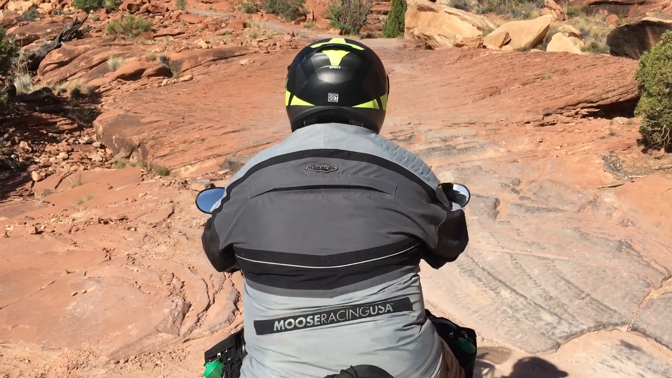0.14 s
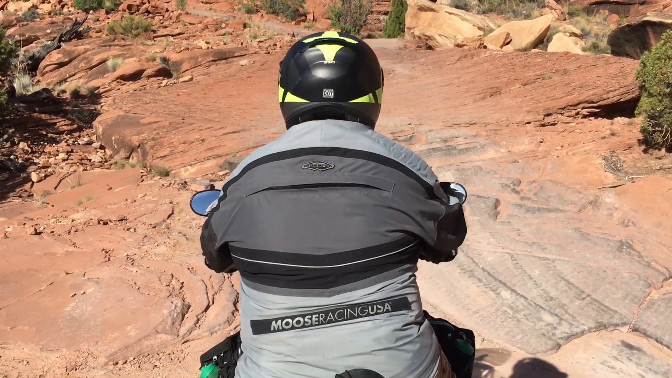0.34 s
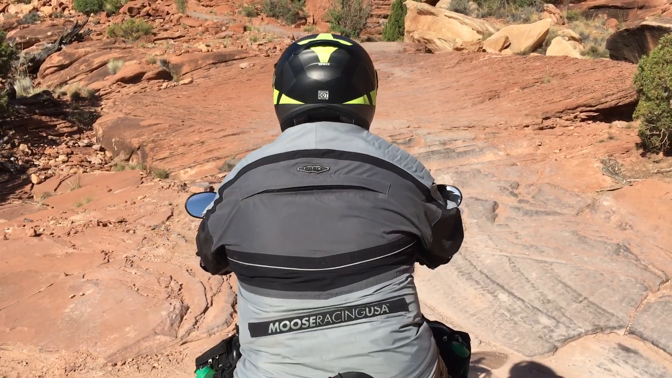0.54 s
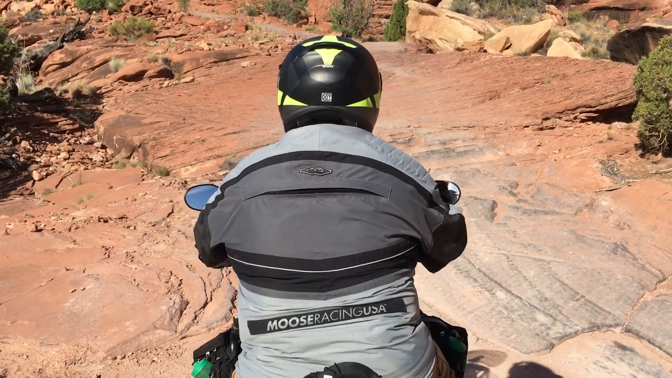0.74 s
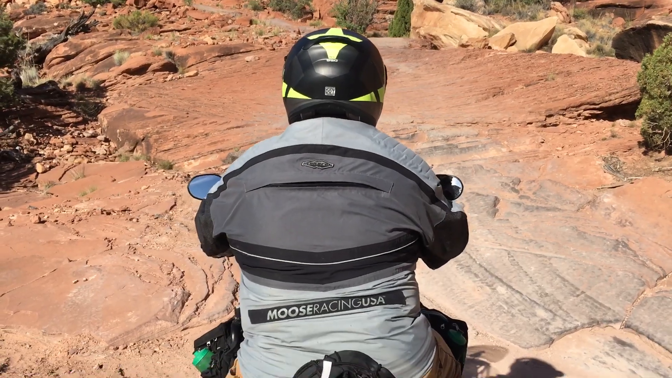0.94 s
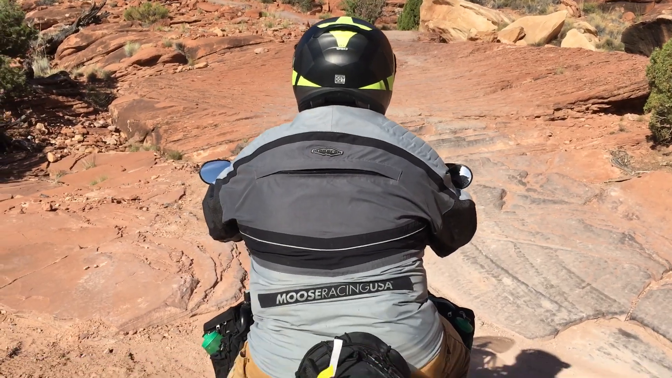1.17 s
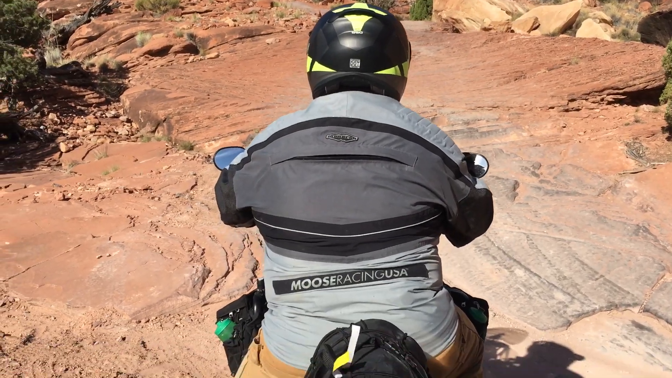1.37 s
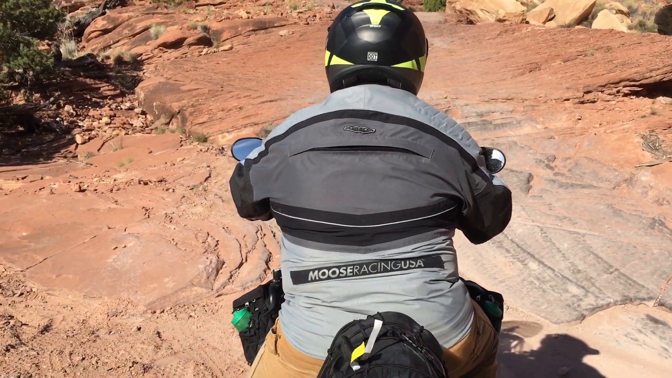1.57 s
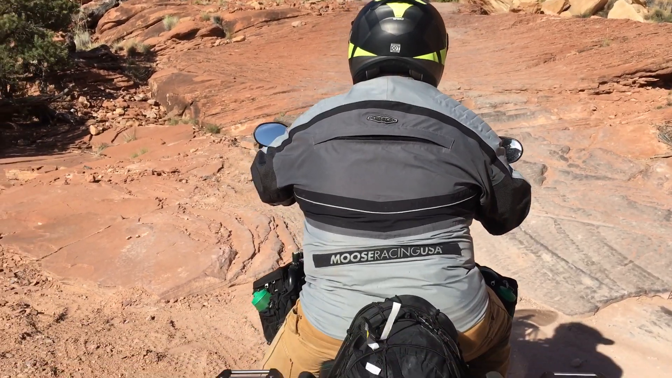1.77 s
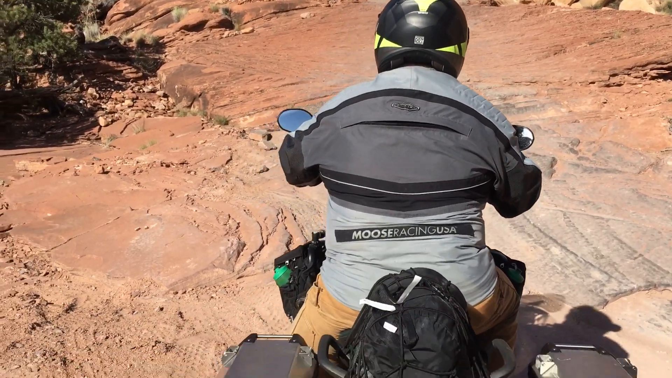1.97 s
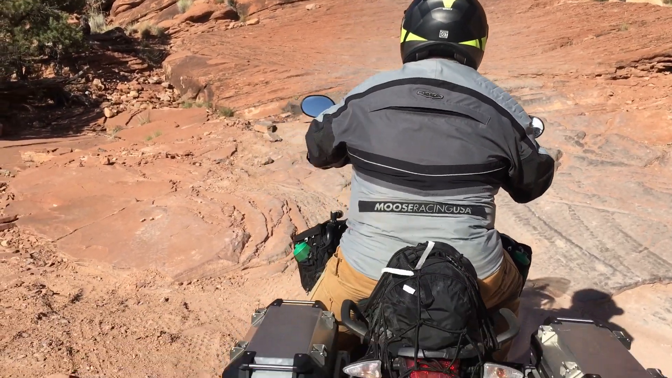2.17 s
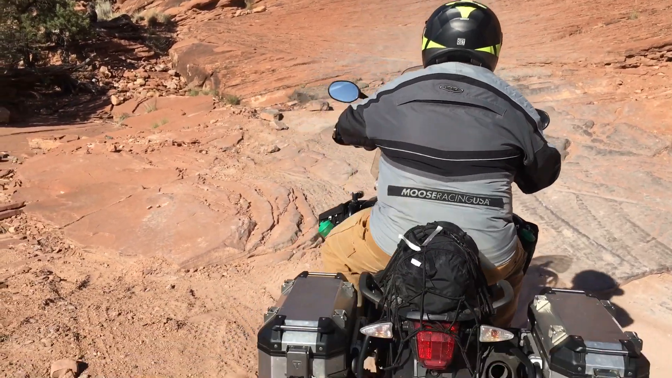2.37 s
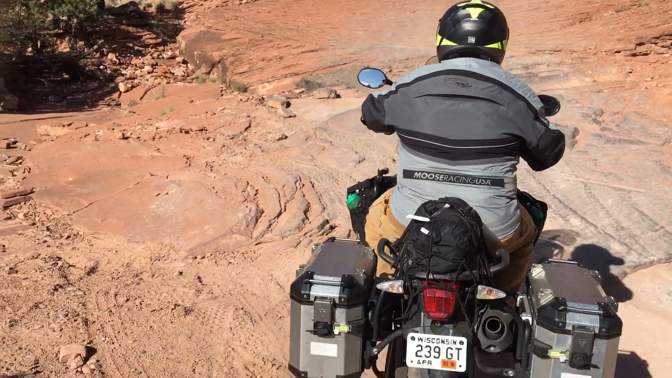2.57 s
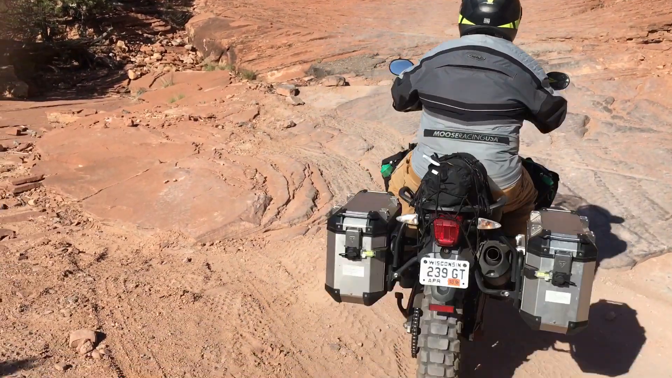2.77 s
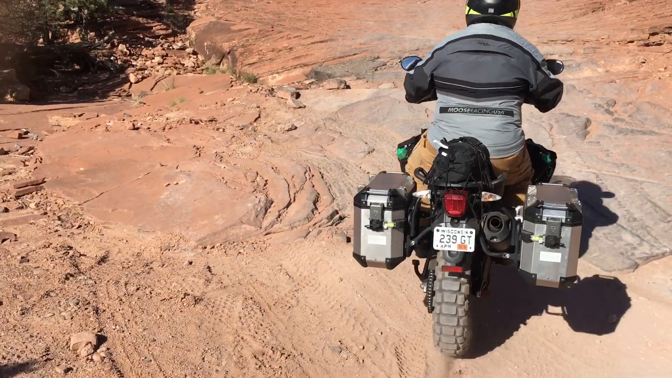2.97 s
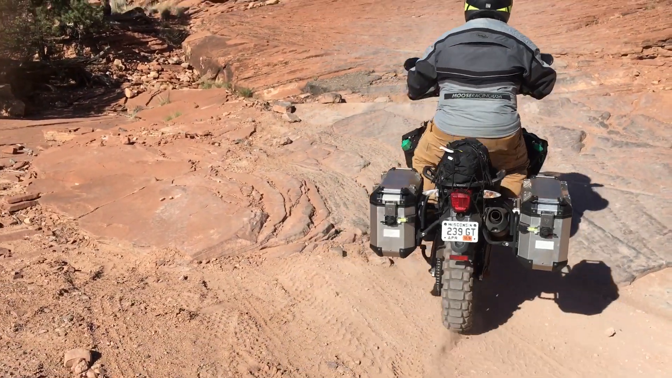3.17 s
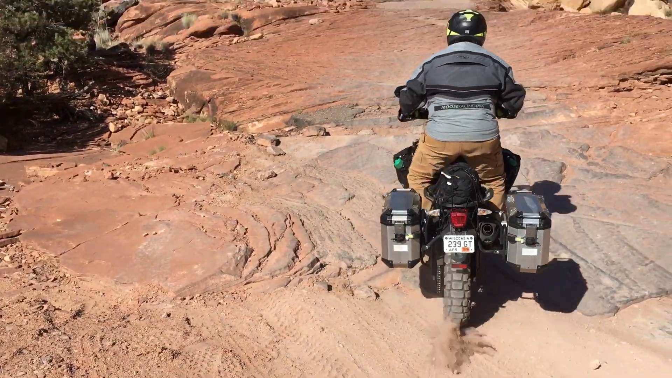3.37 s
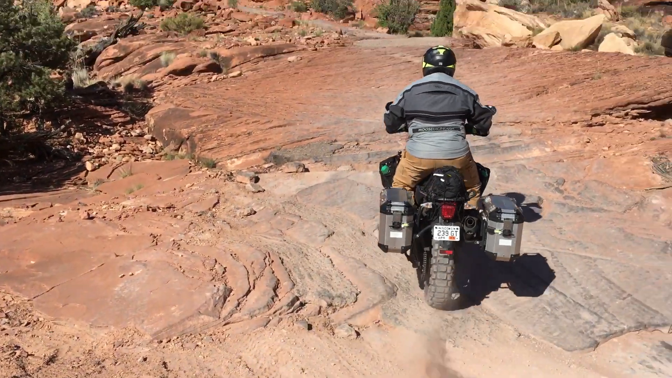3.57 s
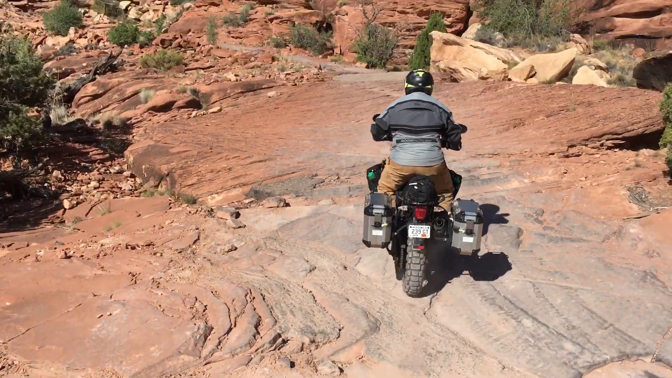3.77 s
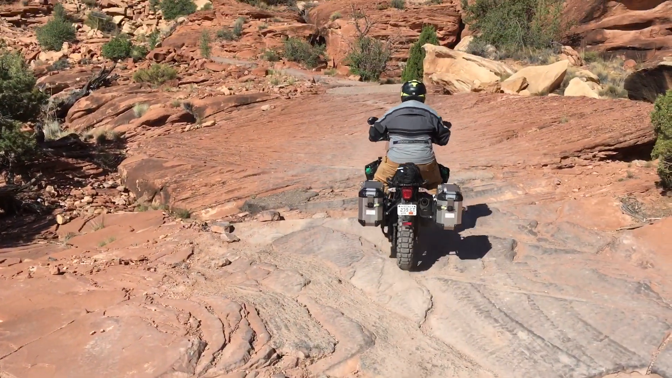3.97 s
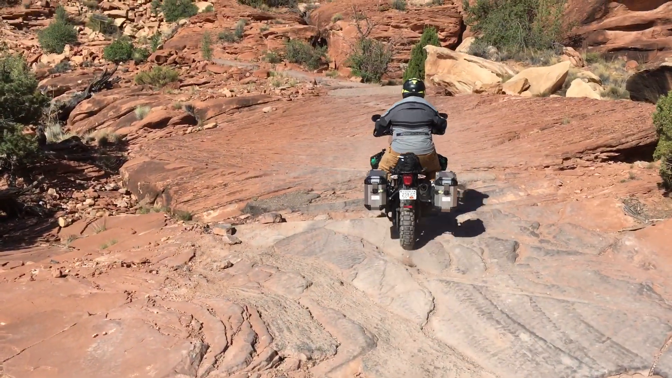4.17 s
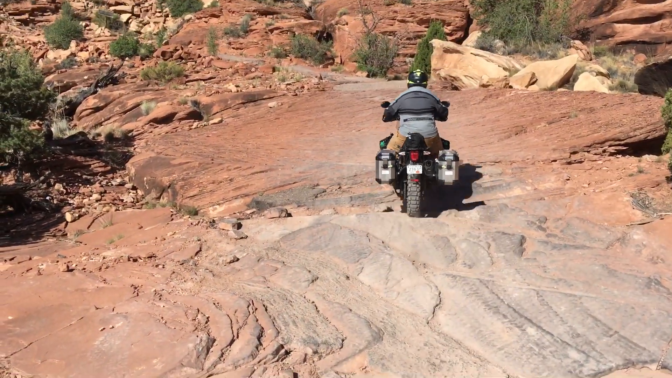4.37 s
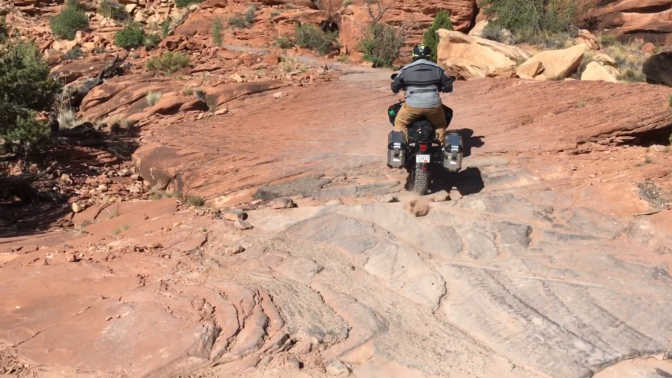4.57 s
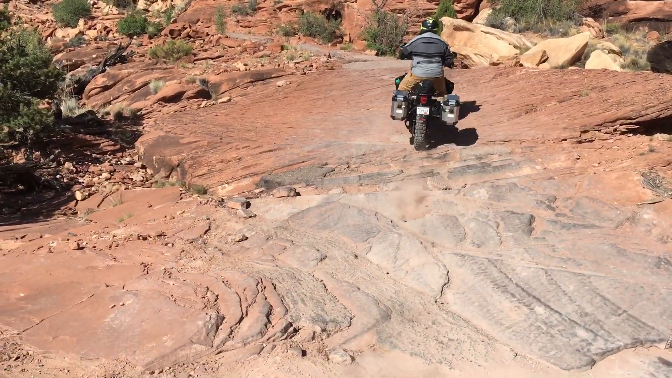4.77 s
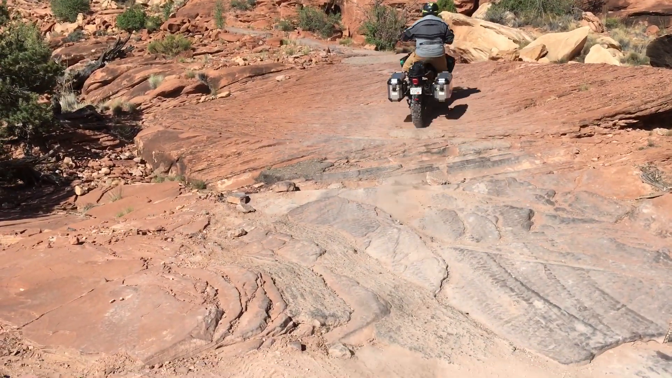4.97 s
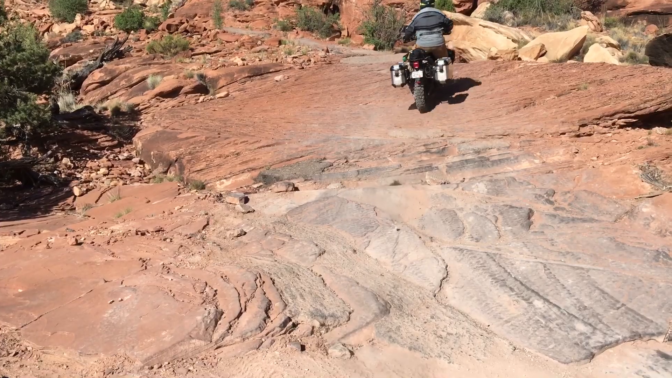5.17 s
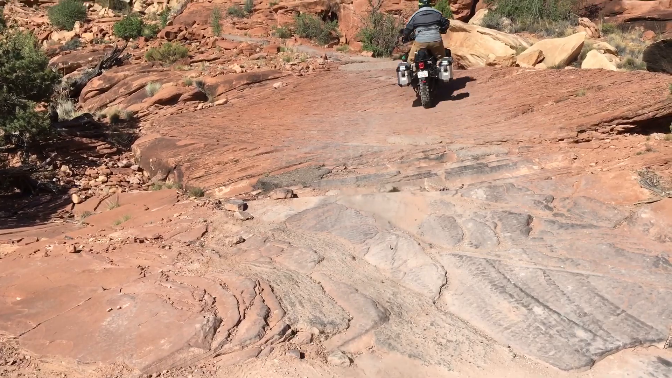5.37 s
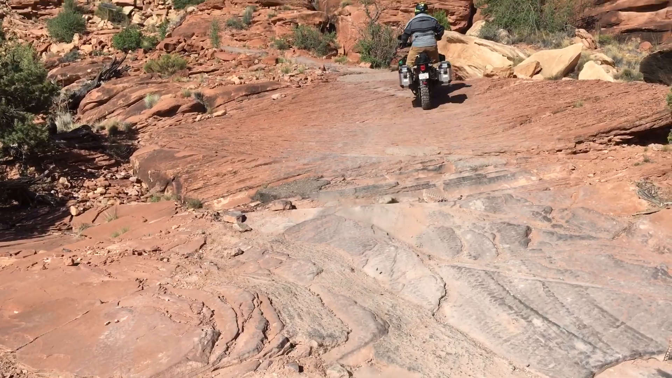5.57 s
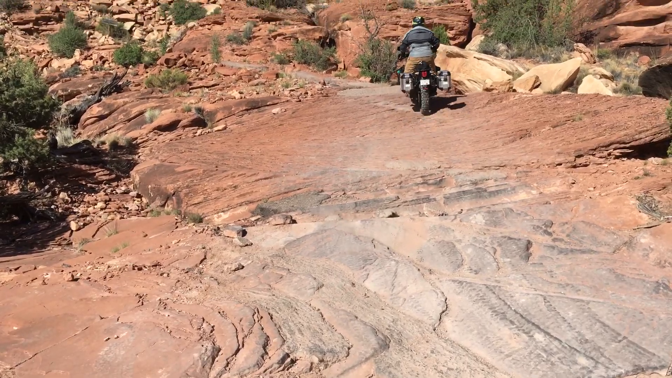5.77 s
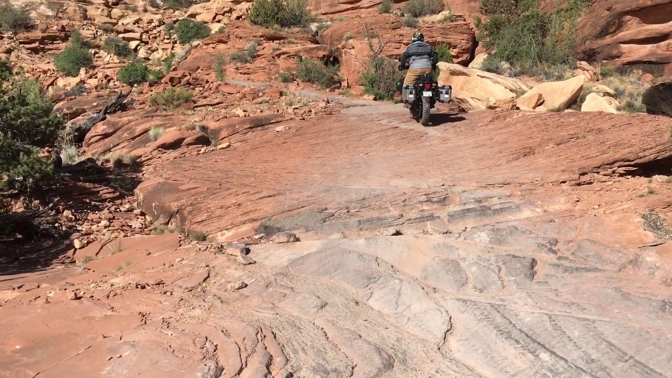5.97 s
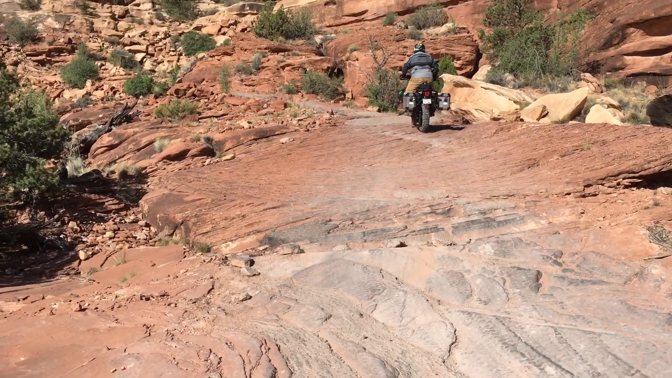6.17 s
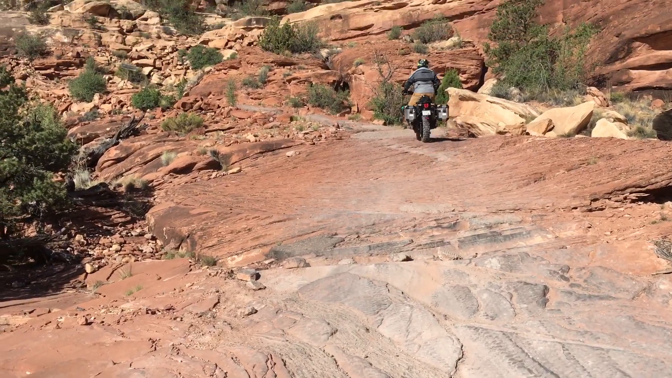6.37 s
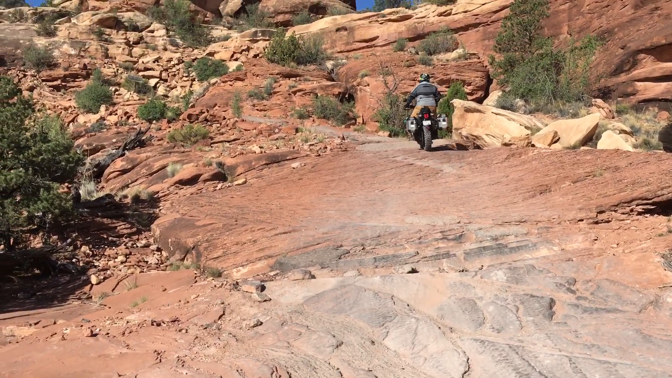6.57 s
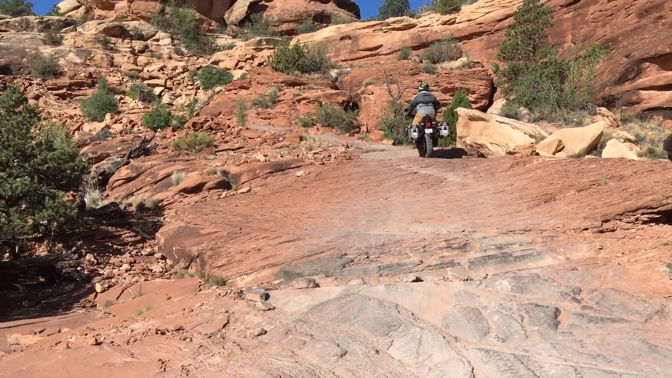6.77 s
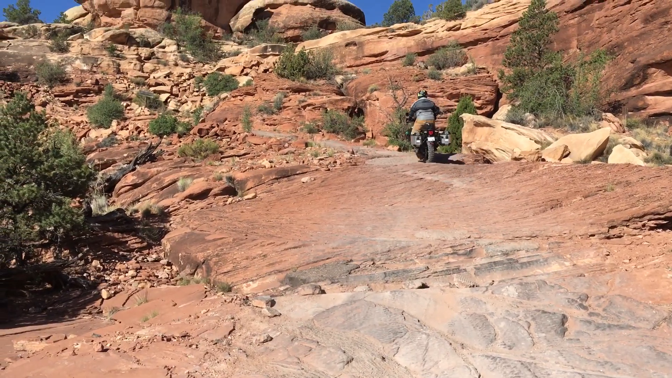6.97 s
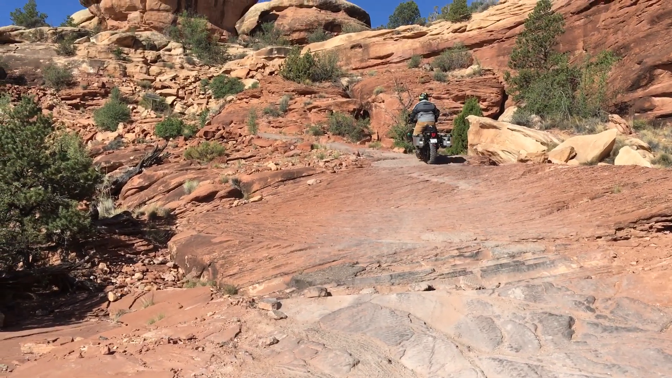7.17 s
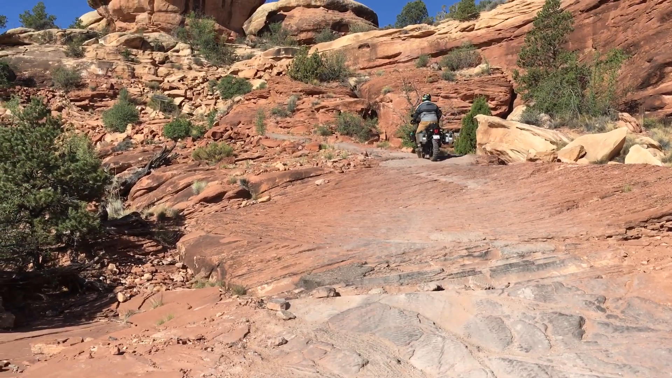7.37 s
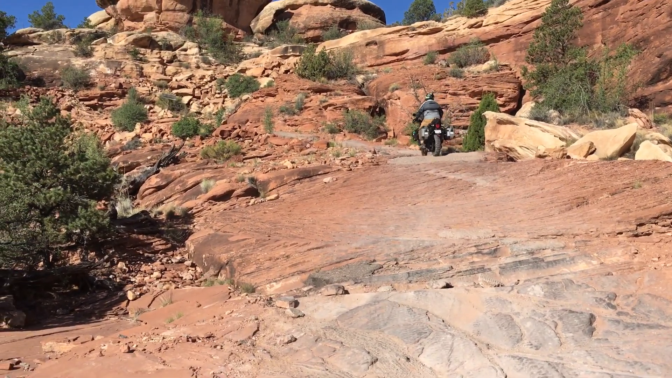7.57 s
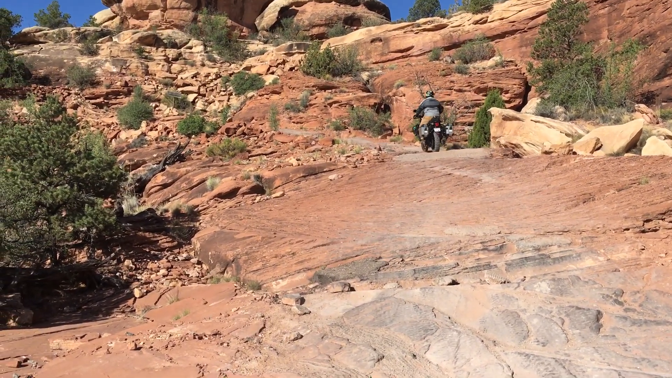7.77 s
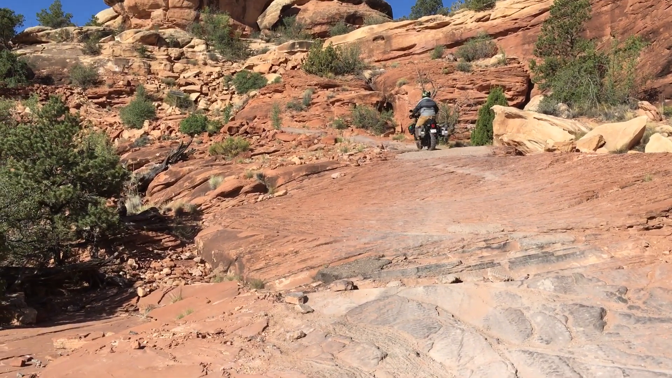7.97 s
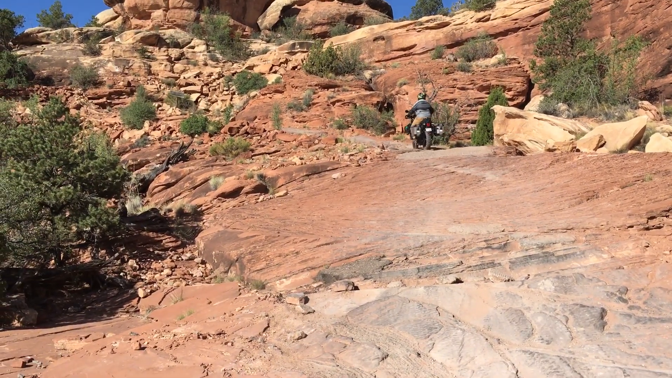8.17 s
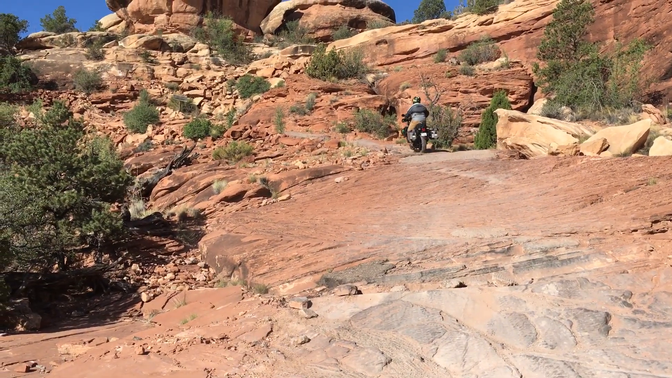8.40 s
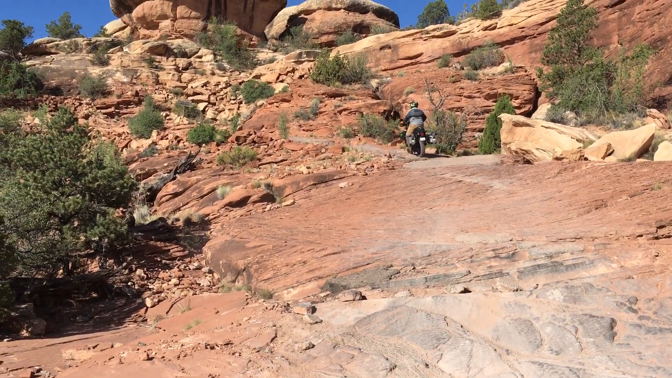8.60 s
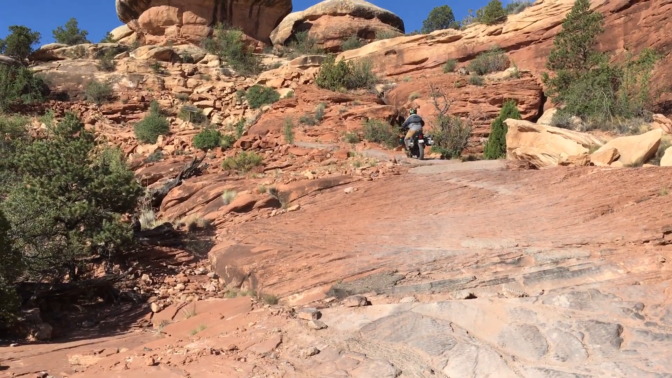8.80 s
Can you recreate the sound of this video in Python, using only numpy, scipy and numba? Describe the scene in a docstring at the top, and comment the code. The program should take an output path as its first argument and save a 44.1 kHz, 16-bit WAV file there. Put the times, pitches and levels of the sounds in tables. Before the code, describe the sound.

A stationary microphone behind a motorcycle hears a steady low idle, casing rattle and whining gears. The throttle opens, the boom climbs, sags, then surges up a rocky slope. In the middle, woody knocks, clacks and gritty sprays cluster over the uneven engine note. A sharp pop, a drop in revs and another high surge follow, then smaller bursts fade into distance over soft, low outdoor air noise.

```python
"""A three-cylinder motorcycle idles just ahead, its firings booming in the silencer and rapping on the casing,
while gears whine in step with the crank and gas and tyres hiss. After about a second the throttle opens.
The machine then climbs away over bare rock in short bursts of throttle; luggage and stones knock, grit sprays
and the throttle snaps with lone pops. Pulses ring filters for the boom; noise bands make the rest,
nearby rock returns the sharper sounds, and the machine ends quieter and duller than it began."""
import sys
import numpy as np
from scipy import signal
from scipy.fft import rfft, irfft
from scipy.io import wavfile
from scipy.ndimage import uniform_filter1d
from numba import njit

SR = 44100
rng = np.random.default_rng(int(sys.argv[2]) if len(sys.argv) > 2 else 0)


def wrap_up_sound(samples):
    """Save the sound to the file named by the first command line argument, as 16-bit audio."""
    columns = np.atleast_2d(samples).T
    # keep every value between -1 and 1, then stretch to whole-number steps
    tamed = np.clip(columns, -1, 1)
    steps = np.round(tamed * 32767).astype(np.int16)
    wavfile.write(sys.argv[1], SR, steps)


N = 389844
IDLE_HZ = 32.6  # firings per second from which rev-dependent levels are counted


def undb(db):
    """Decibels to amplitude."""
    return 10 ** (np.asarray(db) / 20)


def unit(x):
    """Scale to an RMS of 1."""
    return x / np.sqrt(np.mean(x ** 2))


def noise():
    """White noise for the whole scene."""
    return rng.standard_normal(N)


def walk(rate):
    """Random levels held 1 / rate s and slewed twice."""
    hold = int(SR / rate)
    steps = np.repeat(rng.standard_normal(N // hold + 1), hold)
    return uniform_filter1d(uniform_filter1d(steps, hold), hold)[:N]


def follow(points):
    """Automation curve through (time [s], value) points."""
    return np.interp(np.arange(N) / SR, *np.transpose(points))


def bump(t, at, length):
    """Bell-shaped gesture, down to 1/e one length either side of its peak."""
    return np.exp(-((t - at) / length) ** 2)


def late(x, lag_s):
    """Delay without lengthening."""
    return np.pad(x, (int(lag_s * SR), 0))[:len(x)]


def colour(x, points, size=2 ** 14):
    """Causal minimum-phase filter whose gain follows (frequency [Hz], gain [dB]) points."""
    hz, db = np.transpose(points)
    bins_hz = np.arange(size // 2 + 1) * SR / size + 1
    cepstrum = irfft(np.log(undb(np.interp(np.log(bins_hz), np.log(hz), db))))
    cepstrum[1:size // 2] *= 2  # fold the response into causal time
    cepstrum[size // 2 + 1:] = 0
    response = irfft(np.exp(rfft(cepstrum)))[:size // 2]
    return signal.fftconvolve(x, response)[:len(x)]


@njit
def svf(x, hz, width):
    """State-variable band-pass with moving centre and width, gain 1 at the centre."""
    y, b, l = np.empty(len(x)), 0., 0.
    for i in range(len(x)):
        g, k = np.tan(np.pi * hz[i] / SR), width[i] / hz[i]
        v = (b + g * (x[i] - l)) / (1 + g * (g + k))
        b, l, y[i] = 2 * v - b, l + 2 * g * v, k * v
    return y


def band(x, hz, width):
    """One resonance, fixed or moving."""
    return svf(x, hz + np.zeros(len(x)), width + np.zeros(len(x)))


def steep(x, hz, width):
    """The same resonance twice, for steeper sides."""
    return band(band(x, hz, width), hz, width)


# spectrum of the open air: (frequency [Hz], level [dB per Hz])
AIR_SPECTRUM = [(20, -26), (60, 18.5), (200, 13), (400, -23.5), (1500, -35), (6000, -24), (15000, -56)]
AIR_DB = -39  # centre of the drifting level


def air():
    """Noise bed with a slowly drifting level."""
    return undb(AIR_DB + 3 * walk(3)) * unit(colour(noise(), AIR_SPECTRUM))


# returns from nearby rock faces: (delay [s], level [dB])
ECHOES = [(0.024, -13), (0.06, -13), (0.115, -11.5), (.19, -16.5)]


def rock_echoes(sharp_sounds):
    """Rock faces return delayed, weaker copies."""
    return sum(undb(db) * late(sharp_sounds, lag) for lag, db in ECHOES)


# grit thrown by the tyre: (time [s], peak level [dB])
GRIT_SPRAYS = [(2.699, -23.5), (4.272, -29), (4.63, -25), (4.749, -19.5), (4.785, -22), (4.791, -17),
               (4.868, -29), (4.961, -36), (5.178, -32), (5.23, -26), (5.518, -34), (5.608, -34),
               (6.34, -33), (6.374, -32.5), (6.429, -28), (7.43, -30), (8.165, -42)]
SPRAY_S = .011  # time for a spray to fall to 1/e


def grit(low_hz=3500):
    """Sand spray: high-passed noise with a sudden start and a bell-shaped fall."""
    gate, t = np.zeros(N), np.arange(N) / SR
    for s, db in GRIT_SPRAYS:
        gate += undb(db) * (t >= s) * np.exp(-(np.maximum(t - s, 0) / SPRAY_S) ** 2)
    high_pass = signal.butter(2, low_hz, "high", fs=SR, output="sos")
    return gate * signal.sosfilt(high_pass, noise()) / 2.87  # sets the noise level


THUD_DB, CRACK_DB = -2, -8.5  # usual levels above the ring's peak, the thud's at the start
THUD_DB_PER_S = -1.5  # thuds thin out as the machine draws off


def knock(hz, decay, thud_db, crack_db, sharp=5.1, thud_hz=300, thud_s=0.053, crack_s=0.019, crack_hz=1000, blow=0.49):
    """A woody ring, peaking at 1, with a wide crack in front and a dull thud under it."""
    t = np.arange(6000) / SR
    fall = lambda t60: np.exp(-np.log(1000) * t / t60)
    struck = blow * np.sin(2 * np.pi * hz * t) * (t < 1 / hz)  # one firm cycle starts the ring
    ring = band(struck + rng.standard_normal(len(t)) * fall(decay), hz, hz / sharp)
    click = 4 * (t < 1e-4)
    crack = steep((rng.standard_normal(len(t)) + click) * fall(crack_s), crack_hz, 2 * crack_hz)
    thud = np.sin(2 * np.pi * thud_hz * t) * fall(thud_s)
    return ring / np.abs(ring).max() + undb(crack_db) * crack / np.abs(crack).max() + undb(thud_db) * thud


# loud luggage and stones: (time [s], ring peak [dB], pitch [Hz], thud and crack above their usual level [dB])
LOUD_KNOCKS = [(2.795, -26, 924, 2), (3.891, -19.5, 845, -12), (3.995, -20, 1704, 1),
               (4.191, -19, 764.4, -2), (4.219, -23, 1490, -2), (4.529, -25, 795.4, 0),
               (4.558, -23.5, 1460, 7), (4.649, -28.5, 1320, 14), (4.696, -22, 840, 12),
               (4.714, -18.5, 1560, 2), (4.802, -22, 1370, -7), (4.868, -23, 650.6, 9.5),
               (4.913, -19, 734, 6), (4.931, -26, 670, -3), (4.955, -23, 700, 3), (4.971, -21, 690, 0),
               (4.996, -18.5, 681.4, 2), (5.007, -20.5, 680, -1), (5.13, -25.5, 1360, -8),
               (5.343, -27.5, 1330, 2), (5.478, -25.5, 1340, 0), (5.521, -30.5, 1250, 7),
               (5.601, -29, 1500, 5), (5.789, -29, 1410, -8), (6.39, -28.5, 1266, -3),
               (6.472, -31, 1202, -3), (6.897, -32.5, 1310, 2), (6.988, -34, 1296, -4),
               (7.186, -30.5, 1610, 0), (7.372, -33, 1640, 2), (7.979, -33, 1300, -2),
               (8.114, -30, 1440, 0), (8.187, -30.5, 1340, -7), (8.732, -32.5, 1162, -8)]
# top level of the small knocks between them: (time [s], level [dB])
CLATTER_LEVEL = [(0, -60), (3.3, -60), (3.5, -24), (4.4, -26), (4.55, -33), (5.05, -36), (5.2, -28),
                 (6.5, -55), (8.84, -44)]
RING_S, SMALL_RING_S = .05, .035  # 60 dB decay of the noise driving each ring


def knocks(count=130, low_hz=600, octaves=1.3, spread_db=4):
    """Luggage and stones strike: placed loud knocks and a random clatter of small ones."""
    place, pitch, size = rng.random((count, 3)).T
    times = place * N / SR
    levels = np.interp(times, *np.transpose(CLATTER_LEVEL)) + spread_db * np.log(size)
    pitches = low_hz * 2 ** (octaves * pitch)
    small = [(s, db, hz, 0, SMALL_RING_S) for s, db, hz in zip(times, levels, pitches)]
    loud = [(*row, RING_S) for row in LOUD_KNOCKS]
    out = np.zeros(N + 6000)
    for s, db, hz, hard_db, decay in loud + small:
        thud_db = THUD_DB + THUD_DB_PER_S * s + hard_db
        out[int(s * SR):][:6000] += undb(db) * knock(hz, decay, thud_db, CRACK_DB + hard_db)
    return out[:N]


# spectrum of gas and tyres: (frequency [Hz], level [dB per Hz])
HISS_SPECTRUM = [(590, -0.5), (1000, -3), (1400, -3), (1980, -3), (2240, -6), (3170, -8.5), (3870, -7),
                 (6060, -13), (7660, -14.5), (8960, -11), (10400, -15), (14500, -12.5)]
# treble of the hiss reaching the listener: (time [s], level [dB])
HISS_TREBLE = [(0, -7), (1.1, -5.5), (1.5, -5), (2.6, -3), (3.2, -2), (4.8, -2), (5.5, -6), (7, -3),
               (7.6, -7), (8.84, -8)]


def hiss(phase, burst=1.0, steady=1.0, grain_db=2.0, flicker_db=1.5, split_hz=7000):
    """Gas puffs once a firing over tyre crunch made of uneven grains."""
    grains = noise() * undb(grain_db * walk(270) + flicker_db * walk(10))
    full = unit(colour(grains * (steady + np.exp(-phase / burst)), HISS_SPECTRUM))
    low = signal.lfilter(*signal.butter(2, split_hz, fs=SR), full)
    return low + undb(follow(HISS_TREBLE)) * (full - low)


# whine bands, one gear mesh a row: (multiple of the firing rate, offset [Hz], level at idle [dB],
# gain per octave of speed [dB], width [share of the pitch], share of the swell level)
GEAR_MESHES = [(34.46, -9, -7, 4, 0.078, 0.098), (68.4, 4, -18, 7.5, 0.06, 1.6),
               (81.2, 250, -4.5, 1.5, 0.063, 0.5)]
# what the gear cover radiates: (frequency [Hz], gain [dB])
GEAR_COVER = [(1000, -2), (1600, 5.5), (2700, -1.5), (3600, -0.5), (4600, -1.5), (6000, -4.5), (8000, -26)]


def gears(hz, phase, swell_db, pulsing=.25, flutter_db=2.5, blur=.25):
    """Meshing teeth: narrow fluttering bands that follow engine speed, loaded harder at each firing."""
    mesh = 0
    for multiple, plus, db, gain_db, share, swell_share in GEAR_MESHES:
        tooth_hz = multiple * hz + plus
        width_hz = share * tooth_hz * undb(-blur * swell_db)  # wider as the swell level falls
        level_db = db + gain_db * np.log2(hz / IDLE_HZ) + swell_share * swell_db + flutter_db * walk(40)
        mesh = mesh + undb(level_db) * unit(steep(noise(), tooth_hz, width_hz))
    return colour(mesh * (1 + pulsing * np.cos(2 * np.pi * phase)), GEAR_COVER)


# casing resonances: (frequency [Hz], width [Hz], level close by [dB], level far off [dB])
CASING_MODES = [(368, 174, -7.5, -9.5), (583, 93, -3, -8), (708, 144, -21.5, 1.5), (870, 113, 3, -4.5),
                (1226, 640, -20, -11.5)]
# turn of the casing colour from close to far: (time [s], share [0-1])
CASING_FAR = [(0, 0.14), (2.7, 0.3), (3.5, 1), (8.84, 0.71)]
RAP_LAG_S = 0.00594  # the casing answers a little after the firing


def casing(pulses, phase, number, swell_db, hz, burst=1.0, steady=1.0, scatter_db=3.0, rise=0.057, blow_db=8):
    """Each firing strikes the casing and rattles its resonances with a short uneven burst."""
    uneven = undb(scatter_db * rng.standard_normal(N // 100)[number])
    evened = pulses / (np.convolve(pulses, np.ones(3), "same") + 1e-9)  # the casing hears all cylinders alike
    rattle = unit(noise() * (steady + np.exp(-phase / burst) * uneven))
    blows = undb(blow_db + swell_db / 2) * np.sqrt(70 / hz) * unit(evened * uneven)
    rap = rattle + blows
    warm = (hz / 70) ** rise  # the resonances sit higher as the revs rise
    far, out = follow(CASING_FAR), 0
    for k, (mode_hz, width, near_db, off_db) in enumerate(CASING_MODES):
        level = undb(near_db + far * (off_db - near_db))
        # neighbouring modes swing in opposite senses
        out = out + (-1) ** k * level * unit(steep(rap, mode_hz * warm, width))
    return late(unit(out), RAP_LAG_S)


# cylinder strengths in firing order at idle: one column (level [dB])
CYLINDER_LEVELS = [3.5, 0.5, 4.5]


def firings(hz, scatter_db=.4, smoothing=2.5):
    """One pulse per firing, shared between two samples; also the place within each firing and its number."""
    turns = .55 + np.cumsum(hz) / SR  # the cycle is already under way
    number = turns.astype(int)
    at = np.flatnonzero(np.diff(number))
    share = (number[at + 1] - turns[at]) / (turns[at + 1] - turns[at])
    scatter = scatter_db * rng.standard_normal(N // 100)[number[at]]
    uneven_db = np.array(CYLINDER_LEVELS)[number[at] % 3] + scatter
    size = undb(uneven_db * (IDLE_HZ / hz[at]) ** smoothing)  # the cylinders even out as the revs rise
    pulses = np.zeros(N)
    pulses[at] = size * (1 - share)
    pulses[at + 1] = size * share
    return pulses, turns - number, number


# silencer response to one firing, boom then overtones: (frequency [Hz], gain [dB])
SILENCER_BOOM = [(25, -35), (40, -3), (54, -0.5), (64, -0.5), (72, 5.5), (82, 7), (92, 9), (105, 2.5),
                 (125, 0), (200, -57.5)]
SILENCER_OVERTONES = [(60, -45.5), (110, -9), (140, -1.5), (180, -6.5), (215, -7.5), (270, -23.5),
                      (330, -29), (500, -76)]
DEEP_HZ, DEEP_WIDTH_HZ = 65.5, 4.9  # lowest pipe mode


def silencer(drive, overtone_db, deep_db, spread_hz=70, spread_width_hz=45, lag_s=.012):
    """Boom, overtones and the lowest mode; the chambers hold the bass back behind the front of each pulse."""
    boom = colour(late(drive, lag_s), SILENCER_BOOM)
    boom = boom + undb(deep_db) * band(boom, DEEP_HZ, DEEP_WIDTH_HZ)
    smeared = 2 * band(boom, spread_hz, spread_width_hz) - boom  # all-pass: delay around spread_hz
    return smeared - colour(drive * undb(overtone_db), SILENCER_OVERTONES)


# stumbles as the throttle snaps: (time [s], peak level [dB])
THROTTLE_POPS = [(5.255, -11), (5.471, -22), (7.405, -23), (8.494, -24.5), (8.561, -42)]


def pops():
    """Lone pulses that set the silencer's boom ringing."""
    pulses = np.zeros(N)
    for s, db in THROTTLE_POPS:
        pulses[int(s * SR)] = undb(db)
    one_pop = colour(np.eye(1, 4000)[0], SILENCER_BOOM)
    return colour(pulses, SILENCER_BOOM) / np.abs(one_pop).max()


# gain of the lowest pipe mode added to the boom: (time [s], level [dB])
DEEP_LEVEL = [(0, 17.5), (1.101, 22), (1.4, -3.5), (2.6, -15), (3.2, -12), (8.84, 7)]
# moments when the exhaust boom briefly drops: (time [s], depth [dB], length [s])
BOOM_DIPS = [(1.42, 4, 0.024), (2.96, 1, .02), (4.329, 3, 0.02), (5.294, 8.5, 0.051), (5.487, 2, .025),
             (6.006, 2, 0.054), (6.24, 8, 0.014), (6.872, 3.5, 0.044), (7.444, 8, 0.041), (7.606, 2, 0.04),
             (7.97, 1, 0.045), (8.27, 4, 0.035), (8.61, 6.5, 0.041)]


def exhaust(pulses, boom_db, overtone_db):
    """The throttle sets each firing's strength as it rings the silencer."""
    # lead in with one extra cycle so the silencer is already ringing
    first = np.flatnonzero(np.diff(pulses > 0, prepend=False))[::2]
    lead = first[3] - first[0]
    pulses = np.concatenate([pulses[:lead], pulses])
    curves = boom_db, overtone_db, follow(DEEP_LEVEL)
    boom_db, overtone_db, deep_db = (np.pad(c, (lead, 0), mode="edge") for c in curves)
    # level out the response so the boom level alone sets the loudness
    even = silencer(pulses, overtone_db, deep_db)
    power = uniform_filter1d(uniform_filter1d(even ** 2, size=2400), size=2400)
    drive = pulses * undb(boom_db) / np.sqrt(power + 1e-12)
    out = silencer(drive, overtone_db, deep_db)[lead:]
    t = np.arange(N) / SR
    return out * undb(-sum(db * bump(t, at, length) for at, db, length in BOOM_DIPS))


# engine speed before smoothing: (time [s], firing rate [Hz])
ENGINE_SPEED = [(0, 30.9), (1.085, 30.62), (1.21, 39.25), (1.33, 52.05), (1.5, 70.64), (1.72, 85.35),
                (1.8, 86), (1.99, 71.7), (2.29, 69.07), (2.55, 71.6), (2.75, 52.5), (2.865, 45),
                (3.15, 81.1), (3.3, 93.14), (3.41, 92.05), (3.52, 83.2), (3.75, 74), (4.13, 84.05),
                (4.31, 79.1), (4.5, 93.8), (4.65, 84.75), (4.87, 84.2), (5.0, 89.9), (5.1, 89.5),
                (5.25, 118.9), (5.32, 100.5), (5.51, 44.26), (5.65, 42.37), (5.7, 47.95), (5.9, 100.9),
                (6.0, 121), (6.08, 116.9), (6.25, 88.8), (6.38, 73.2), (6.5, 81.1), (6.62, 83.25),
                (6.8, 83), (6.92, 72.35), (7.1, 62.2), (7.26, 77.26), (7.35, 83.5), (7.44, 77.3),
                (7.57, 70.9), (7.68, 73.9), (7.93, 97), (8.1, 84.9), (8.3, 60.23), (8.47, 70.8),
                (8.67, 63.9), (8.84, 62)]
FLYWHEEL_S = .04  # the crank's inertia: speed is averaged twice over this time
# levels as the machine draws off, before revs, pull and jolts: (time [s], boom [dB],
# overtones above the boom [dB], casing rap [dB], hiss [dB], gear whine above the hiss [dB])
RIDE_LEVELS = [(0, -16.5, 4.5, -43, -41.5, 4.5), (1.049, -16, 7.5, -41, -40, 6.5),
               (1.22, -10, 1, -40, -39.5, -3.5), (1.419, -16.5, 1, -41.5, -42.5, -0.5),
               (1.8, -16, 5, -42.5, -39.5, -5), (2.0, -12.5, -1.5, -39, -40.5, -3),
               (2.55, -13, -7, -44.5, -42.5, -4.5), (2.85, -13.5, -8.5, -35.5, -40.5, -10),
               (3.1, -10.5, -9, -40, -44, -10), (3.4, -13, -2, -47.5, -44, -15),
               (3.6, -12, -7, -52, -46, -11.5), (4.3, -12.5, -5.5, -48.5, -47.5, -16),
               (4.499, -15, -2, -46.5, -45.5, -12.5), (4.75, -14, -4.5, -52, -46.5, -22),
               (5.15, -17, -3.5, -50, -54, -5), (5.4, -23, -4, -55, -48.5, -16),
               (5.8, -19.5, -4.5, -49, -52.5, -6.5), (6.1, -22.5, 0.5, -52.5, -52.5, -10.5),
               (6.55, -20.5, -4.5, -55, -56, -4), (7.1, -23.5, -1.5, -58, -51, -14),
               (7.35, -21.5, -4, -58, -54.5, -9), (7.6, -26, -2.5, -54, -56.5, -4),
               (8.1, -22, -3.5, -47.5, -58, -9), (8.4, -27.5, -3, -54, -57.5, -8),
               (8.84, -33.5, 18, -51, -57, -8)]
# what those five levels gain when the revs double, in the same order: one column (gain [dB])
REV_GAINS = [0.16, 4.57, 5.3, 7.75, .1]
# what they gain at most in a hard climb of the revs, and lose as the revs sink: one column (gain [dB])
PULL_GAINS = [0.046, -0.37, -0.33, 0.2, -0.22]
PULL_S = .4  # a climb of one octave in this time is a firm pull
# wheels jolting over ledges, shaking casing and grit: (time [s], rap gain [dB], hiss gain [dB])
LEDGE_JOLTS = [(2.8, 4, -2.5), (3.421, 4.5, 3), (3.99, 5, 0), (4.199, 6, 3.5), (4.53, 8, 4), (4.7, 1, -1),
               (4.79, -1, 7.5), (4.95, 8, 6), (5.01, -1, 3.5), (5.24, -5, 2.5), (6.39, -1, 5.5),
               (7.37, 8, 3)]
JOLT_S = 0.029  # time from the peak of a jolt to 1/e


def ride():
    """Engine speed, and the levels that follow from distance, revs, pull and jolts."""
    t = np.arange(N) / SR
    smooth = lambda x: uniform_filter1d(x, size=int(FLYWHEEL_S * SR), mode="nearest")
    hz = smooth(smooth(follow(ENGINE_SPEED)))
    octaves = np.log2(hz / IDLE_HZ)
    pull = np.tanh(np.gradient(octaves) * SR * PULL_S)
    s, *columns = np.transpose(RIDE_LEVELS)
    boom_db, overtone_db, rap_db, hiss_db, whine_db = (
        np.interp(t, s, c) + rev_gain * octaves + pull_gain * pull
        for c, rev_gain, pull_gain in zip(columns, REV_GAINS, PULL_GAINS))
    shake_db, crunch_db = sum(np.outer(dbs, bump(t, at, JOLT_S)) for at, *dbs in LEDGE_JOLTS)
    # the whine rides on the hiss level, so take the jolts back out of it
    return hz, boom_db, overtone_db, rap_db + shake_db, hiss_db + crunch_db, whine_db - crunch_db


# level shared by gear whine and casing blows, a dip, a swell, then a fall: (time [s], level [dB])
WHINE_AND_BLOW_SWELL = [(0, 1), (2.65, -1.5), (2.85, -8.5), (3.3, 5), (4.5, 0), (8.84, -12)]


def scene():
    """Mix the ride; only knocks, grit, hiss and gears reach the rock echoes."""
    hz, boom_db, overtone_db, rap_db, hiss_db, whine_db = ride()
    swell_db = follow(WHINE_AND_BLOW_SWELL)
    pulses, phase, number = firings(hz)
    rap = undb(rap_db) * casing(pulses, phase, number, swell_db, hz)
    hiss_and_whine = hiss(phase) + undb(whine_db) * gears(hz, phase, swell_db)
    sharp_sounds = knocks() + grit() + undb(hiss_db) * hiss_and_whine
    engine = exhaust(pulses, boom_db, overtone_db) + pops() + rap
    return (air() + rock_echoes(sharp_sounds) + sharp_sounds + engine)[None]


TOP_HZ = 15620  # upper limit of the microphone path


def record(dry):
    """The microphone path cuts the top with a steep low-pass."""
    return signal.sosfilt(signal.ellip(12, .2, 80, TOP_HZ, fs=SR, output="sos"), dry)


dry = scene()
out = record(dry)
wrap_up_sound(out)
```